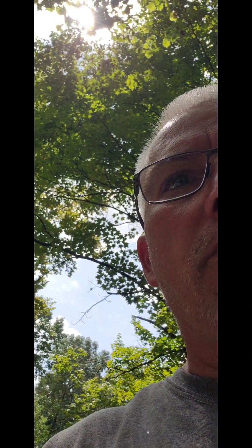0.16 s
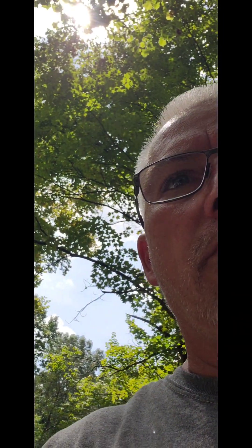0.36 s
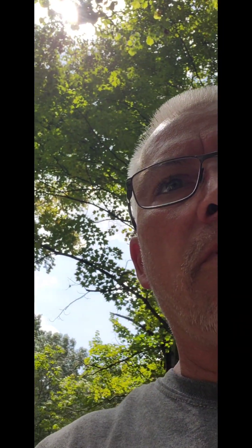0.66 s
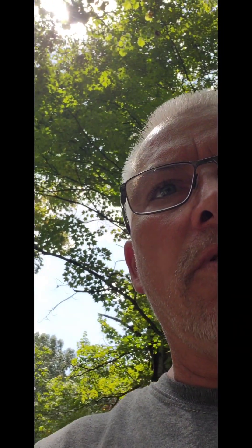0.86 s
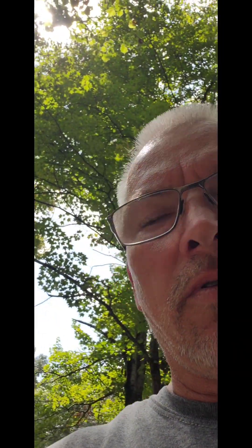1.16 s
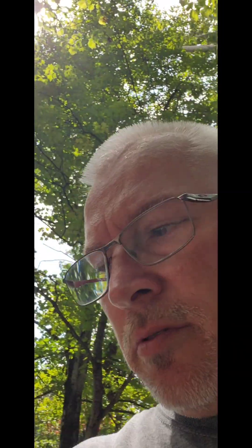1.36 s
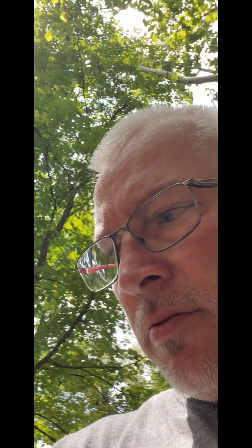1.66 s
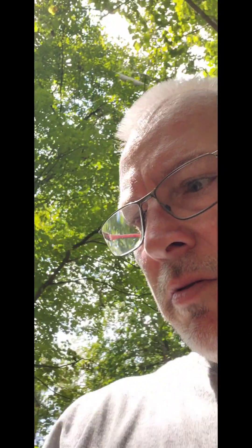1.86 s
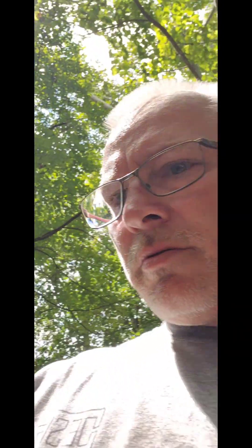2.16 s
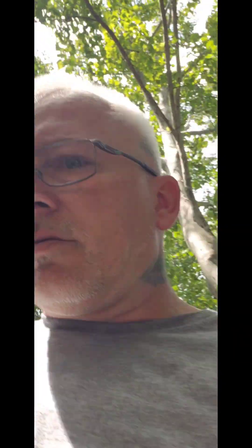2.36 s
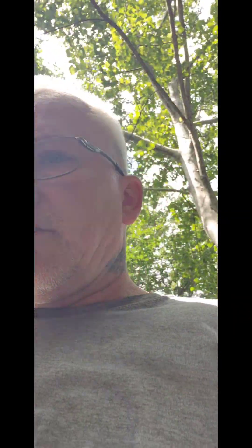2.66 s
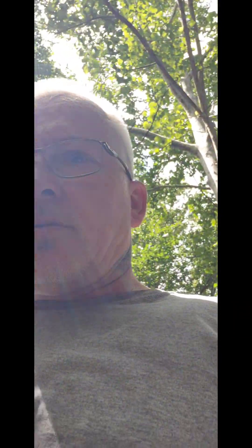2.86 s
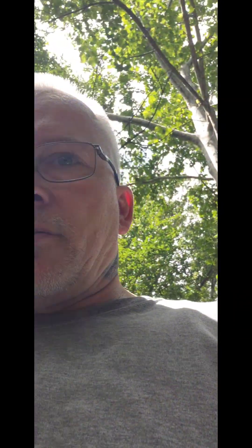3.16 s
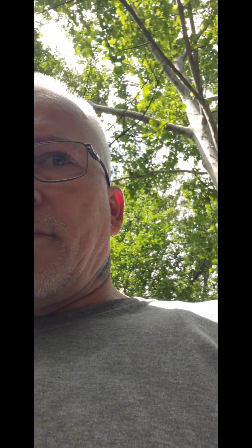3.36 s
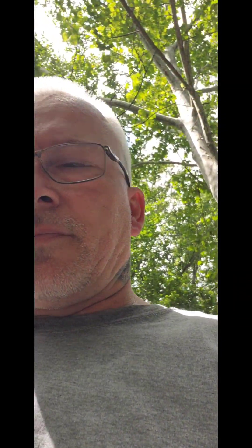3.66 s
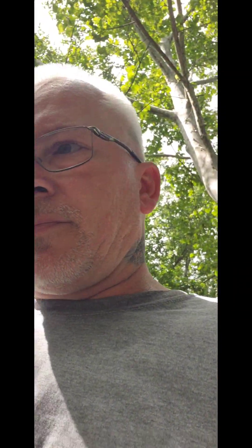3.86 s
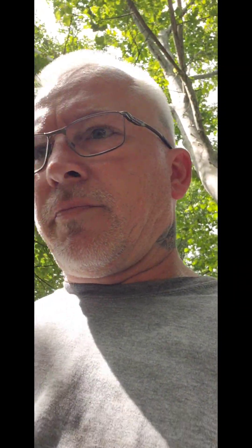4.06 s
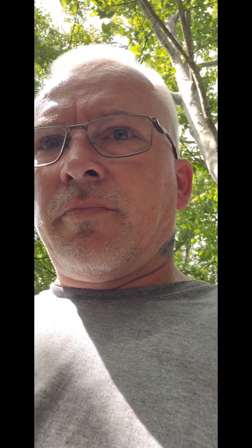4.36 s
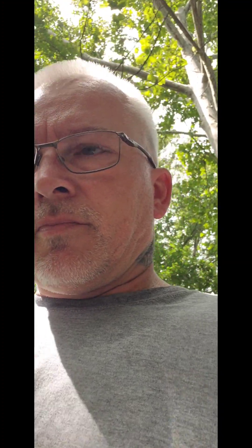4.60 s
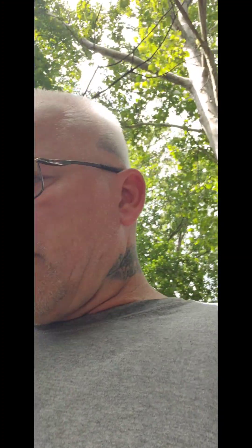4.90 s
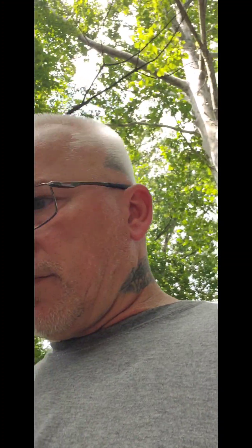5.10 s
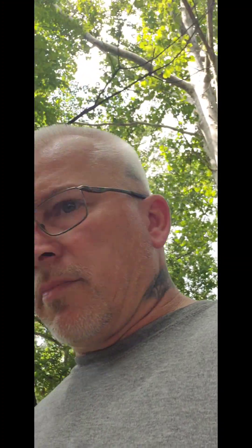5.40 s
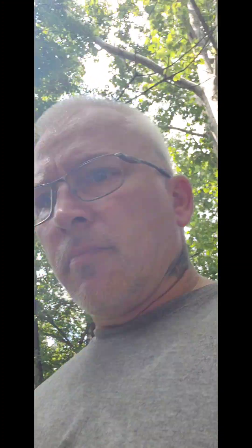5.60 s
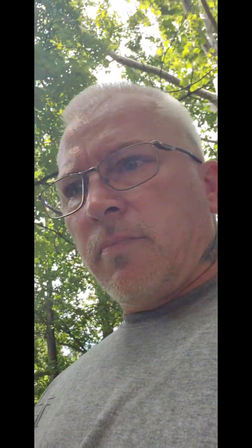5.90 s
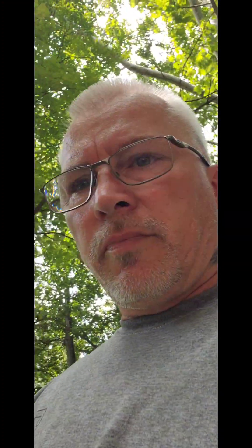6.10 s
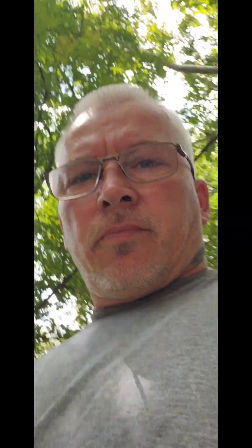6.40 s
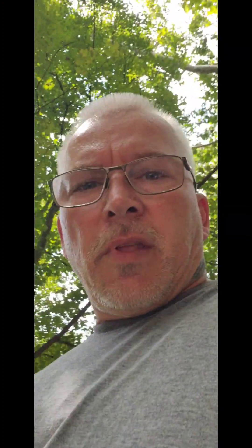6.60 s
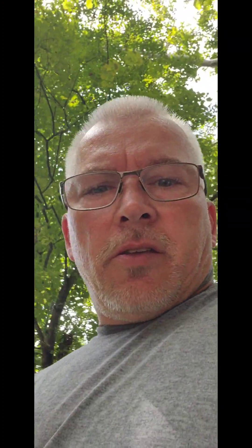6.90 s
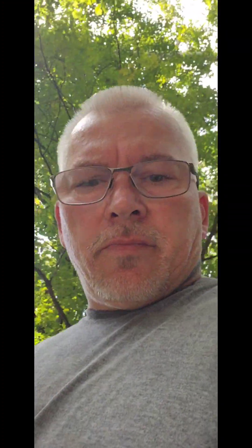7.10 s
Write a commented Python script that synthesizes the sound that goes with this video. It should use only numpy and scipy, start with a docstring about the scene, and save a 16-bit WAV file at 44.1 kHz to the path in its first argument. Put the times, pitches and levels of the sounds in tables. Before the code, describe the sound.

Close outdoor motorcycle start: rattling, whining cranking for half a second, explosive exhaust bark, fast uneven loping, then a steady low thumping idle with light hiss.

```python
"""The exhaust of a big V-twin motorcycle dominates, outdoors and close by: each firing excites a resonant
pressure pulse, and delayed, duller copies of it form the echoes of its pipe. The engine catches with a burst,
lopes on alternating cycles and settles into an even idle. Crackle is noise gated by pulses; hiss and clatter
are coloured noise modulated by the firings; the cases are struck resonators; a gear whines as a drifting sine.
Before the catch the starter cranks, with rattle, released compression, groans, whine and clacks."""
import sys
import numpy as np
from scipy import signal
from scipy.fft import rfft, irfft
from scipy.io import wavfile

SR = 44100
rng = np.random.default_rng(int(sys.argv[2]) if len(sys.argv) > 2 else 0)


def wav_record(signal):
    """Record a signal, one row per channel, as 16-bit PCM in the file named by sys.argv[1]."""
    frames = np.transpose(np.atleast_2d(signal))
    bounded = np.clip(frames, -1, 1)
    # unit amplitude maps onto the largest positive 16-bit level
    quanta = np.round(bounded * 32767).astype(np.int16)
    wavfile.write(sys.argv[1], SR, quanta)


N = 319725
T = np.arange(N) / SR   # time of each sample [s]

# Stereo coherence of noise: (frequency [Hz], left-right correlation [1])
LIKENESS = [(60, .97), (250, .9), (500, .72), (1000, .6), (2000, .4), (15000, .35)]
CUTOFF_HZ = 15800

# Positions of the turning listener: first to second between the first two times, second to third in the last two
TURNS_S = (1.6, 2.1, 4.9, 5.5)

# Starter: pistons dragged over the top:
# (release time [s], rattle level [dB], released-gas level [dB], chuff level [dB])
COMPRESSIONS = [(0.029, -31, -20.5, -51), (0.262, -24.5, -19.5, -18.5), (0.537, -20.5, -20, -21.5)]
RATTLE_LEADS_S, CHUFF_LAGS_S = 0.026, .008
# steady levels between compressions
RATTLE_FLOOR_DB, RELEASE_FLOOR_DB, CHUFF_FLOOR_DB = -28.5, -41.5, -33.5
# exponential time constants
RATTLE_RISE_S, RATTLE_FALL_S = 0.022, 0.046
RELEASE_RISE_S, RELEASE_FALL_S = 0.015, 0.015
CHUFF_RISE_S, CHUFF_FALL_S = 0.0064, 0.044
CRANK_MOVES_S = .12   # the chuff is weaker until the crank turns
# Spectra of gas chuff, gear rattle and released gas: (frequency [Hz], relative density [dB per Hz])
CHUFF_SPECTRUM = [(15, -39), (25, 1.5), (120, -1.5), (224, -8.5), (260, -1.5), (373, -38), (400, -7.5),
                  (520, -20), (880, -120)]
RATTLE_SPECTRUM = [(88, -41), (150, -4), (299, -2.5), (367, -0.5), (401, -9.5), (587, -1), (967, -6.5),
                   (1840, -9.5), (5000, -19), (6500, -20.5), (11000, -120)]
RELEASE_SPECTRUM = [(1760, -33), (3000, -19), (5850, -7), (7450, 3.5), (10000, 3.5), (13200, 5),
                    (16200, -1.5), (16800, -23)]
# Thin high squeal and hiss that swell, then stop short: (peak time [s], squeal level [dB], hiss level [dB])
SQUEALS = [(.095, -42, -36), (.39, -33, -34.5)]
SQUEAL_RISE_S, SQUEAL_FALL_S = 0.051, .008
PINION_HZ, SQUEAL_HZ = 2470, 13000
# Pinion whine: (time [s], level [dB])
PINION_LEVEL = [(0, -58), (.176, -34), (.25, -39), (.32, -46), (.39, -37), (.55, -46), (.62, -50)]
# Tones of the starter gears: (mean frequency [Hz], width [Hz], relative level [dB])
GEAR_TONES = [(1234, 200, 0.5), (1860, 72, -1), (2690, 190, -17), (3160, 130, -5.5), (3750, 120, -9.5),
              (4210, 120, -13), (4600, 120, -14)]
# Downward groans as a piston passes its top:
# (onset time [s], length [s], first frequency [Hz], last frequency [Hz], relative level [dB])
GROANS = [(.0, 0.077, 268, 198, -25.5), (0.192, 0.091, 270, 113, -27.5), (0.497, 0.073, 272.2, 173, -21.5)]
# Harmonics 1 to 6 of the groan: (relative level [dB])
GROAN_HARMONICS = (-2.5, -8, -7, -14, -17, -21)
# Clacks of the starter gear: (time [s], relative level [dB])
CLACKS = [(0.418, -6.5), (0.5866, -15), (0.614, -15)]
# Modes of a clack: (frequency [Hz], relative level [dB], twice the 60 dB decay time [s])
CLACK_MODES = [(4460, -18, 0.26), (7700, -4, 0.19), (8240, 0, 0.07), (9900, -13, 0.1), (10300, -9, 0.085),
               (10650, -19, 0.098), (12160, -3, 0.024), (12590, -6, 0.039), (14520, -22, 0.087)]

# Running engine as the turning listener hears it: (time [s], relative clatter level [dB],
# share of hiss in puffs [1], relative whine level [dB], relative case level [dB],
# relative rasp level [dB], left-right balance before a fixed offset [dB])
HEARD = [(.9, -34, .25, -45, -41, -40, -1.5), (1.6, -32.5, 0.31, -47.5, -44.5, -37, -2.5),
         (2.1, -34.5, 0.22, -44, -45.5, -22, -2), (2.7, -35, 0.42, -41.5, -32.5, -36, -1.5),
         (4.9, -35.5, 0.59, -43.5, -35, -22, -0.5), (5.5, -36, 0.76, -44, -46, -27, -0.5),
         (6.5, -36, 0.82, -54, -33, -23.5, -2), (7.25, -35, 0.8, -70, -37.5, -19.5, -2)]
# Clatter (first) and cases (second) are louder just after the catch; exponential fade
SURGE_S, SURGE_DB, SURGE_FADE_S = 0.56, (14.5, 20), 0.18
# Hiss: (time [s], relative level [dB])
HISS_LEVEL = [(.6, -44.5), (.85, -49.5), (1.8, -51.5), (2.25, -45), (2.8, -45), (4.7, -43.5), (5.4, -45),
              (6.3, -42.5), (7.1, -42)]
# One spectrum of hiss and of clatter per position: (frequency [Hz], relative density [dB per Hz])
HISS_SPECTRA = [
    [(1760, -23), (3000, -9.5), (5370, -7), (6370, -8.5), (13600, -7), (16200, -10), (16800, -31)],
    [(1760, -13), (3000, -8.5), (6510, -8.5), (8710, -4.5), (9620, -5), (12300, 2), (16200, -7),
     (16800, -9.5)],
    [(1470, -6), (2500, -3), (2810, -4.5), (4240, -1), (6690, -6.5), (13100, 3.5), (16200, -6), (16800, -8)],
]
CLATTER_SPECTRA = [
    [(180, -1.5), (300, 0), (330, -18), (448, -2.5), (608, -12.5), (676, -11.5), (1040, -9.5),
     (1710, -17.5), (1970, -14.5), (2140, -20), (5000, -33.5), (6500, -65), (11000, -120)],
    [(180, -26), (300, -9.5), (346, -16.5), (389, 3), (510, -23.5), (630, -12.5), (734, -10.5),
     (1420, -18.5), (1880, -17), (2220, -24), (5000, -30), (6500, -36), (11000, -120)],
    [(180, -41), (300, -5), (350, -43), (407, -1), (708, -10.5), (1110, -22), (1350, -16), (1950, -20.5),
     (2250, -19.5), (2810, -28), (5000, -29.5), (6500, -38), (11000, -120)],
]
# Gear whine: (time [s], frequency [Hz])
WHINE_PITCH = [(.6, 1860), (1.1, 1936), (1.8, 1873), (2.8, 1931), (3.7, 1808), (4.5, 1767), (7.25, 1864)]
# Freed starter spinning down: (time [s], frequency [Hz], level [dB])
RUNDOWN = [(.56, 2500, -50), (1.0, 2500, -46.5), (1.45, 2436, -43), (1.75, 2280, -56), (1.9, 2250, -54)]
# Low drone from the cases: (time [s], frequency [Hz], level [dB])
DRONE = [(1.6, 787, -47), (2.3, 760, -48), (4.8, 730.7, -47), (5.3, 724, -63)]
# One short metallic chirp: (time [s], frequency [Hz], relative level [dB], 60 dB decay time [s])
CHIRP = (1.103, 3800, -19, .06)
# Case modes rung by each blast: (frequency [Hz], relative level before the last turn [dB],
# relative level after it [dB], 60 dB decay time [s])
CASE_MODES = [(391, 1.5, 6.5, 0.087), (434.7, -8, 1.5, 0.13), (517, -68, -5, 0.16), (635, -22, -6, 0.056),
              (734, -7, -12, 0.2)]
# Gas flow keeps shaking the cases after each blast
SHUDDER_DB, SHUDDER_RISE_S, SHUDDER_FALL_S = -21.5, 0.0055, 0.016

# Unburnt fuel cracking in the pipes: (time [s], relative level [dB])
CRACKLES = [(0.593, -11.5), (0.627, -17), (0.657, -13.5), (0.714, -19), (0.762, -16.5), (0.798, -16),
            (0.868, -19)]

# Uneven first cycles: (time of front pressure dip [s], front blast level [dB], rear delay [ms],
# rear blast level [dB])
FIRST_CYCLES = [(0.585, -15, 9.6, -27), (0.6288, -6, 16.7, -3), (0.664, -5.5, 11.5, -35),
                (0.7031, -4.5, 37.3, -1.5)]
REGULAR_FROM_S = .785
# Crank speed: (time [s], speed [rpm])
SPEED = [(0.78, 1691.9), (1.0, 1766.7), (1.3, 1765.3), (1.7, 1592.8), (2.4, 1398.2), (2.7, 1364.0),
         (3.0, 1371.7), (3.2, 1354.3), (3.5, 1270.4), (3.9, 1312.8), (4.0, 1293.4), (4.3, 1303.5),
         (5.6, 1304.1), (7.25, 1293.3)]
# Alternating cycles: (time [s], mean front level [dB], mean rear level [dB], mean rear delay [cycle])
EVEN_CYCLES = [(.785, -0.5, -2.5, .43), (1.06, -23, -2, 0.47), (1.47, -14.5, -2.5, 0.41),
               (1.62, -6.5, -2.5, 0.38), (2.08, -2, -1, .41), (2.42, -3.5, -1, 0.39),
               (2.76, -4, -10.5, .425), (3.3, -3.5, -13.5, 0.4), (5.0, -3.5, -11.5, 0.42),
               (7.25, -4.5, -9, 0.42)]
ODD_CYCLES = [(.855, -2, -15, 0.36), (1.27, -5, -14, 0.47), (1.55, -7, -18, 0.38), (1.85, -7, -11, 0.29),
              (2.16, -3, -10.5, 0.4), (2.5, -1.5, -9.5, 0.35), (2.85, -4, -9, .365), (3.3, -5, -13, 0.39),
              (5.0, -3, -12.5, 0.41), (7.25, -5, -9, 0.42)]
BLAST_SPREAD_DB, REAR_SPREAD_MS = (.6, 1.2), .8   # standard deviations: (front, rear) level, rear delay
CHANCE = rng.standard_normal((100, 3))   # per cycle: front strength, rear strength, rear delay

# Direct blast, then the returns in each pipe: (delay [ms], gain while loping [1], gain at even idle [1])
FRONT_PIPE = [(0, 1.15, 1.295), (3.96, 0.6, -0.37), (12.4, 0.95, 0.53), (19.11, 0.083, 0.78),
              (31.75, 0.071, 0.054), (35.53, 0.15, 0.2), (55.43, 0.38, 0.95)]
REAR_PIPE = [(0, 1, 1.41), (2.21, 0.17, -0.79), (14.78, 0.3, 1.3), (18.01, 0.82, 0.41), (36.95, 0.25, 1.01),
             (54, 0.23, -0.19), (76.6, 0.48, -0.93)]
SETTLING_S = (2.37, 2.82)   # from loping to even idle
# First rich charges going off in the pipes: (time [s], relative level [dB])
CATCH = [(0.578, -5), (0.587, -4), (.602, 4), (.620, -2), (0.643, 3), (.661, 5.5), (0.685, -5)]


def from_db(db):
    """Level-amplitude relation: the gain is 10 to the power dB/20."""
    return 10 ** (np.asarray(db) / 20)


def rms_one(x):
    """Power normalisation: the signal is divided by its rms value."""
    return x / np.sqrt(np.mean(x ** 2) + 1e-20)


def in_time(rows):
    """Linear interpolation: each column becomes a curve over all samples."""
    s, *columns = np.transpose(rows)
    return [np.interp(T, s, c) for c in columns]


def at_hz(points, hz):
    """Logarithmic frequency axis: a spectrum is interpolated between its points."""
    f, value = np.transpose(points)
    return np.interp(np.log(hz), np.log(f), value)


def clicks(times, gains):
    """Impulse excitation: single-sample impulses of the given gains."""
    out = np.full(N, 1e-18)
    index = (np.asarray(times) * SR).astype(int)
    np.add.at(out, np.minimum(index, N - 1), gains)
    return out


def two_pole(x, hz, q, high=False):
    """Second-order resonance: a low- or high-pass whose peak grows with q."""
    w = 2 * np.pi * hz / SR
    c, damp = np.cos(w), np.sin(w) / (2 * q)
    if high:
        b = np.array([1, -2, 1]) * (1 + c) / 2
    else:
        b = np.array([1, 2, 1]) * (1 - c) / 2
    return signal.lfilter(b, [1 + damp, -2 * c, 1 - damp], x)


def ring(x, hz, t60):
    """Free damped vibration: an impulse starts an exponentially decaying sine."""
    r, w = from_db(-60 / (t60 * SR)), 2 * np.pi * hz / SR
    return signal.lfilter([0, np.sin(w)], [1, -2 * r * np.cos(w), r * r], x)


def swell(x, rise_s, fall_s):
    """Two cascaded relaxations: each impulse becomes a smooth rise and fall."""
    up, down = np.exp(-1 / (rise_s * SR)), np.exp(-1 / (fall_s * SR))
    return signal.lfilter([1 - up], np.convolve([1, -up], [1, -down]), x)


def humps(times, levels_db, floor_db, rise_s, fall_s):
    """Exponential growth and decay: peaks about each moment are added to a steady floor."""
    after = T - np.reshape(times, (-1, 1))
    shape = np.exp(np.where(after < 0, after / rise_s, -after / fall_s))
    return from_db(floor_db) + from_db(levels_db) @ shape


def noise(spectrum):
    """Partial coherence: stereo noise of rms 1 mixes a common and an opposed part by frequency."""
    hz = np.maximum(np.fft.rfftfreq(N, 1 / SR), 1)
    alike = np.clip(at_hz(LIKENESS, hz), -1, 1)
    mid, side = rfft(rng.standard_normal((2, N))) * from_db(at_hz(spectrum, hz))
    common = np.sqrt(1 + alike) * mid
    opposed = np.sqrt(1 - alike) * side * [[1], [-1]]
    return rms_one(irfft(common + opposed, N))


def turning(colours):
    """Equal-power crossfade: the noise colour passes from one listening position to the next."""
    place = np.interp(T, TURNS_S, [0, 1, 1, 2])
    out = 0
    for k, colour in enumerate(colours):
        weight = np.clip(1 - np.abs(place - k), 0, 1)
        out = out + np.sqrt(weight) * noise(colour)
    return out


def whine(hz, width_hz):
    """Narrow-band modulation: a sine drifts in size and phase, partly apart on each side; rms 1."""
    # drift is drawn at every 32nd sample
    slow = two_pole(rng.standard_normal((2, 3, N // 32 + 1)), 16 * width_hz, .6)
    drift = slow[0] + 1j * slow[1]
    carrier = np.exp(2j * np.pi * np.cumsum(hz + 0 * T) / SR)
    coarse, fine = np.arange(drift.shape[1]), np.arange(N) / 32
    sides = [np.interp(fine, coarse, own + .8 * drift[2]) for own in drift[:2]]
    return rms_one((sides * carrier).real)


def firings():
    """Four-stroke principle: each cylinder has one blast time and strength per two crank turns."""
    cycles = np.cumsum(in_time(SPEED)[0]) / 120 / SR
    cycles -= np.interp(REGULAR_FROM_S, T, cycles)
    s = np.interp(np.arange(int(cycles[-1]) + 1), cycles, T)
    index = (s * SR).astype(int)
    even, odd = (np.array(in_time(rows))[:, index] for rows in (EVEN_CYCLES, ODD_CYCLES))
    front_db, rear_db, part = np.where(np.arange(len(s)) % 2, odd, even)
    chance = CHANCE[:len(s)].T
    front_db = front_db + BLAST_SPREAD_DB[0] * chance[0]
    rear_db = rear_db + BLAST_SPREAD_DB[1] * chance[1]
    later_ms = part * np.gradient(s) * 1000 + REAR_SPREAD_MS * chance[2]
    regular = [s, front_db, later_ms, rear_db]
    s, front_db, later_ms, rear_db = np.hstack([np.transpose(FIRST_CYCLES), regular])
    s = s - .0025   # the valve opens just before the pressure dip is deepest
    return (s, from_db(front_db)), (s + later_ms / 1000, from_db(rear_db))


def groans():
    """Harmonic synthesis: gliding sums of harmonics under half-sine envelopes."""
    out = 0
    for s, length, from_hz, to_hz, level_db in GROANS:
        part = np.clip((T - s) / length, 0, 1)
        phase = 2 * np.pi * np.cumsum(from_hz + (to_hz - from_hz) * part) / SR
        groan = sum(from_db(db) * np.sin((k + 1) * phase) for k, db in enumerate(GROAN_HARMONICS))
        out = out + from_db(level_db) * np.sin(np.pi * part) * groan
    return out


def clacks():
    """Modal excitation: gear impacts ring damped modes and release a noise burst."""
    s, peak_db = np.transpose(CLACKS)
    out = np.zeros((2, N))
    for hz, level_db, t60 in CLACK_MODES:
        for side in out:
            strike_db = peak_db + level_db - 10 + rng.normal(0, 2.0, len(s))
            side += ring(clicks(s, from_db(strike_db)), hz, t60 / 2)
    burst = swell(clicks(s, from_db(peak_db)), 0.0015, 0.0098)
    return out + from_db(-4.5) * burst * noise(RELEASE_SPECTRUM)


def starter():
    """Amplitude modulation by load: each compression swells the gas noise, gear rattle and gear tones."""
    top, rattle_db, release_db, chuff_db = np.transpose(COMPRESSIONS)
    rattle = humps(top - RATTLE_LEADS_S, rattle_db, RATTLE_FLOOR_DB, RATTLE_RISE_S, RATTLE_FALL_S)
    release = humps(top, release_db, RELEASE_FLOOR_DB, RELEASE_RISE_S, RELEASE_FALL_S)
    chuff = humps(top + CHUFF_LAGS_S, chuff_db, CHUFF_FLOOR_DB, CHUFF_RISE_S, CHUFF_FALL_S)
    chuff *= np.interp(T, [CRANK_MOVES_S - .02, CRANK_MOVES_S], [.3, 1])
    peak, squeal_db, hiss_db = np.transpose(SQUEALS)
    release += humps(peak, hiss_db, -60, SQUEAL_RISE_S, SQUEAL_FALL_S)
    squeal = humps(peak, squeal_db, -60, SQUEAL_RISE_S, SQUEAL_FALL_S)
    pinion_db, = in_time(PINION_LEVEL)
    # uneven tooth contacts, about 300 a second
    contacts = (rng.random(N) < 300 / SR) * rng.exponential(1, N)
    teeth = rms_one(swell(contacts, 0.00055, 0.0021))
    out = release * noise(RELEASE_SPECTRUM)
    out += rattle * (0.52 + 0.26 * teeth) * noise(RATTLE_SPECTRUM)
    out += from_db(pinion_db) * whine(PINION_HZ, 200) + squeal * whine(SQUEAL_HZ, 121)
    wobble = 1 + .05 * np.sin(2 * np.pi * 3.6 * T)   # periodic rise and sag of gear speed
    for hz, width_hz, level_db in GEAR_TONES:
        out += rattle * from_db(level_db - 13.5) * whine(hz * wobble, width_hz)
    out += groans()
    fade = np.interp(T, [.6, .66], [1, 0])
    gears = out * fade + clacks()
    pipes = chuff * noise(CHUFF_SPECTRUM) * fade
    return pipes + gears * from_db([[-2], [2]])   # the starter sits to the right


def gear_tones(whine_db, throb):
    """Quasi-periodic tones: a throbbing gear whine, the starter's run-down, a drone and a struck chirp."""
    whine_hz, = in_time(WHINE_PITCH)
    out = from_db(whine_db) * (0.35 + 0.74 * throb) * whine(whine_hz, 97)
    for table, width_hz in (RUNDOWN, 150), (DRONE, 50):
        hz, level_db = in_time(table)
        out += from_db(level_db) * whine(hz, width_hz)
    s, hz, level_db, t60 = CHIRP
    strike = swell(clicks([s], from_db(level_db)), .002, .00002)
    return out + ring(strike, hz, t60) * 20


def case_ring():
    """Forced and free vibration: blasts and the gas shudder after them excite the case modes; rms 1."""
    cases = np.zeros(N)
    for hz, early_db, late_db, t60 in CASE_MODES:
        for s, gain in firings():
            level_db = np.interp(s, TURNS_S[2:], [early_db, late_db])
            knock = clicks(s, gain * from_db(level_db + rng.normal(0, 4.8, len(s))))
            shaking = swell(knock, SHUDDER_RISE_S, SHUDDER_FALL_S)
            shudder = from_db(SHUDDER_DB) * shaking * rng.standard_normal(N)
            cases += ring(knock + shudder, hz, t60)
    return rms_one(cases)


def engine_pulses():
    """Periodic excitation: one impulse per blast, with three valve ticks in each cycle."""
    (front, strong), (rear, weak) = firings()
    uneven = from_db(rng.normal(0, 1.6, (len(front), 5)))
    pulses = clicks(front - .0012, (strong + 0.033) * uneven[:, 0])
    pulses += clicks(rear - .001, (weak + 0.02) * uneven[:, 1])
    cycle = np.gradient(front)
    # (part of cycle, size)
    for k, (at, size) in enumerate([(.33, 0.14), (.62, 0.059), (.78, 0.17)]):
        pulses += clicks(front + at * cycle, size * uneven[:, 2 + k])
    return pulses


def running():
    """Amplitude modulation by the firings: hiss puffs, clatter and whine throb, and the cases ring."""
    clatter_db, puffed, whine_db, case_db, _, pan_db = in_time(HEARD)
    surge = np.exp(-np.maximum(T - SURGE_S, 0) / SURGE_FADE_S)
    clatter_db, case_db = clatter_db + SURGE_DB[0] * surge, case_db + SURGE_DB[1] * surge
    hiss_db, = in_time(HISS_LEVEL)
    pulses = engine_pulses()
    puffs = rms_one(swell(pulses, 0.0031, 0.0032))
    puffed = np.clip(puffed, 0, 1)
    hiss = from_db(hiss_db + 6.5) * (1 - puffed + puffed * puffs) * turning(HISS_SPECTRA)
    throb = 1 - 0.96 * puffed + 0.85 * puffed * rms_one(swell(pulses, 0.0014, 0.036))
    clatter = from_db(clatter_db + 3) * throb * turning(CLATTER_SPECTRA)
    tones = gear_tones(whine_db, throb)
    cases = from_db(case_db) * case_ring()
    started = np.interp(T, [.56, .6], [0, 1])
    balance = from_db(np.outer([.5, -.5], pan_db - 1.3))
    return started * (hiss + clatter + tones + cases) * balance


def crackle():
    """Impulsive noise: short cracks after the catch and a rasp on every blast."""
    s, level_db = np.transpose(CRACKLES)
    bursts = swell(clicks(s, from_db(level_db - 4.5)), 0.0013, 0.0061)
    blasts = sum(clicks(at, gain * from_db(rng.normal(0, 2.3, len(at)))) for at, gain in firings())
    rasp_db = in_time(HEARD)[4]
    bursts += from_db(rasp_db) * swell(blasts, .001, 0.0033)
    shared, own = rng.standard_normal(N), rng.standard_normal((2, N))
    band = two_pole(two_pole(shared + own, 820, 1.0, high=True), 1520, 1.0)
    return bursts * rms_one(band)


def exhaust():
    """Reflection in a pipe: a dip-then-peak blast has duller returns, changing as pipes warm and idle evens."""
    even, out = np.interp(T, SETTLING_S, [0, 1]), 0
    for (s, gain), pipe, pan_db in zip(firings(), (FRONT_PIPE, REAR_PIPE), (-1.3, 1.1)):
        valve = clicks(s, -gain)
        blast = two_pole(two_pole(valve, 207.4, 3.79), 122.8, 0.71)
        blast = two_pole(blast, 55.6, 1.78, high=True) * from_db(39.5)
        blast = blast * from_db([[pan_db], [-pan_db]])   # the pipe mouths lie apart
        dull = two_pole(blast, 111.4, 0.96)
        for k, (ms, loping, idling) in enumerate(pipe):
            delay = round(ms * SR / 1000)
            late = np.pad(dull if k else blast, ((0, 0), (delay, 0)))[:, :N]
            out = out + late * (loping + (idling - loping) * even)
        # fired or not, the piston pumps a soft slug of gas that keeps the pipe booming while it lopes
        slug = ring(clicks(s, 0.44), 65.6, 0.75)
        out = out + (1 - even) * from_db(-18.0) * slug
    s, level_db = np.transpose(CATCH)
    bangs = ring(clicks(s, from_db(level_db)), 115, 0.045)
    return out + two_pole(bangs, 275, 0.72)


def scene():
    """Interaural delay: the summed sources reach the left later, more so before the listener first turns."""
    left, right = exhaust() + crackle() + running() + starter()
    lag_s = np.interp(T, TURNS_S[:2], [18 / SR, 6 / SR])
    return np.array([np.interp(T - lag_s, T, left), right])


def record(dry):
    """Saturation and band limiting: peaks are rounded and the top treble is cut steeply."""
    steep = signal.ellip(8, .5, 50, CUTOFF_HZ, fs=SR, output="sos")
    return signal.sosfilt(steep, 1.316 * np.tanh(dry / 1.172))


dry = scene()
out = record(dry)
wav_record(out)
```